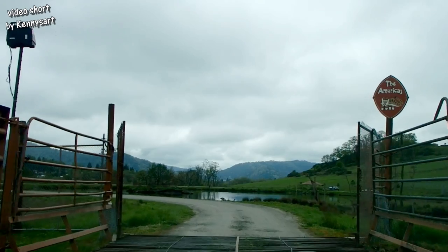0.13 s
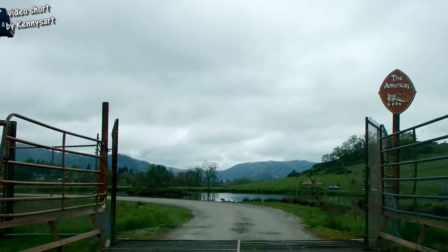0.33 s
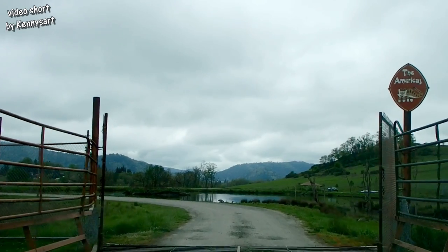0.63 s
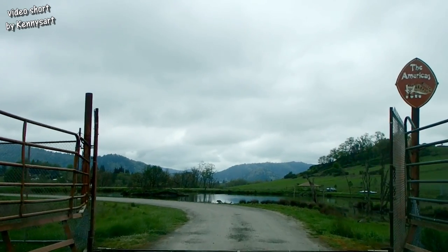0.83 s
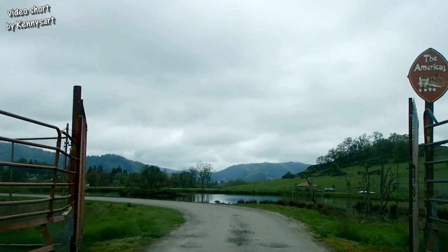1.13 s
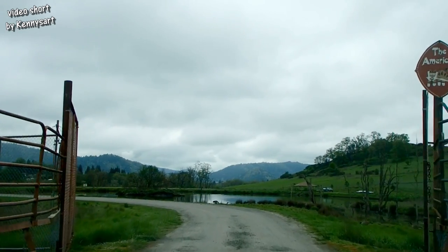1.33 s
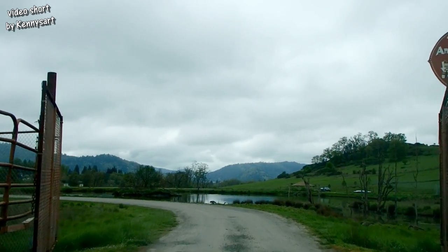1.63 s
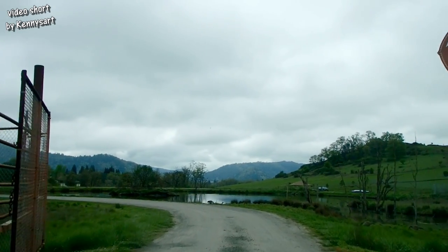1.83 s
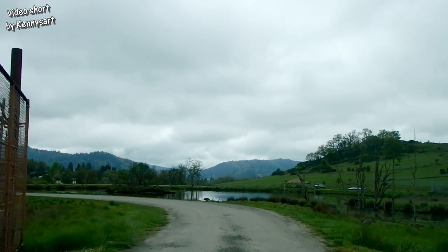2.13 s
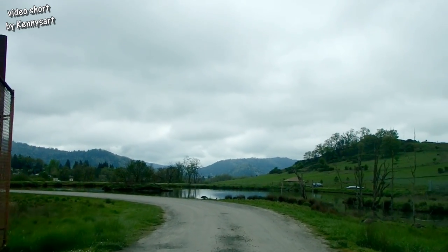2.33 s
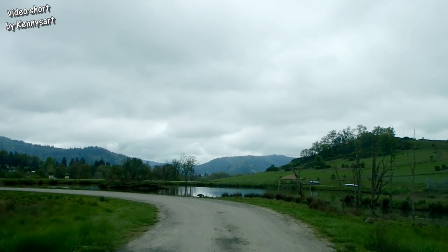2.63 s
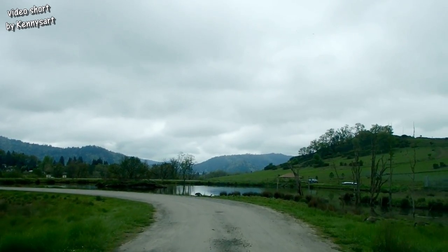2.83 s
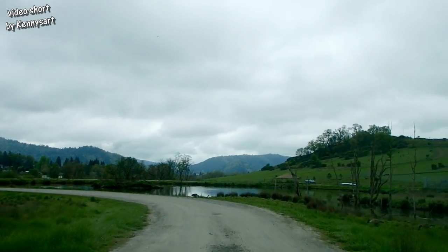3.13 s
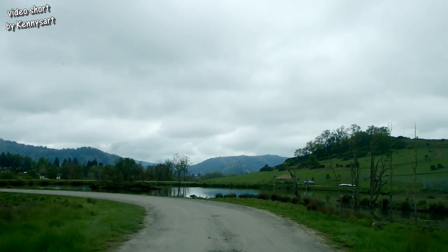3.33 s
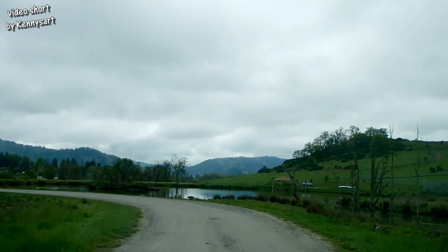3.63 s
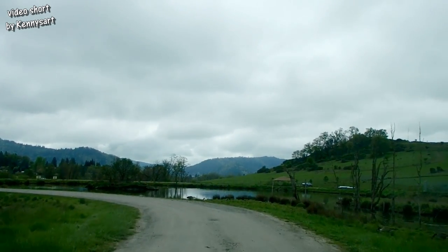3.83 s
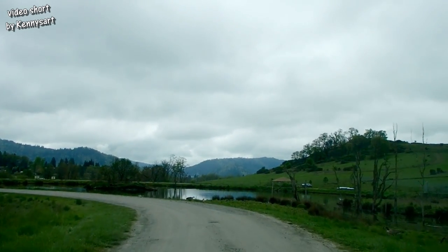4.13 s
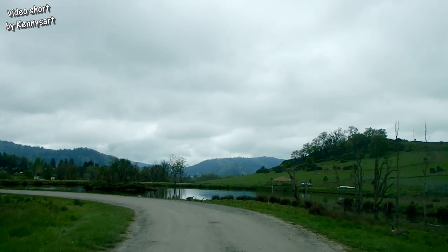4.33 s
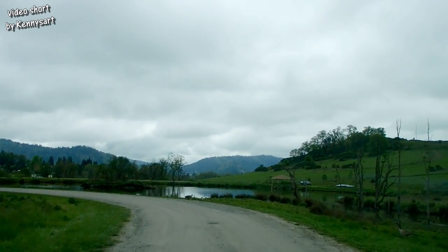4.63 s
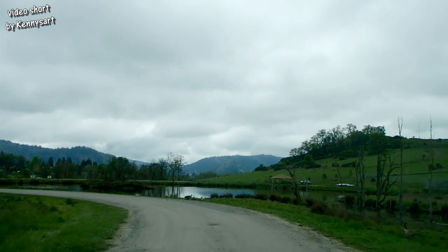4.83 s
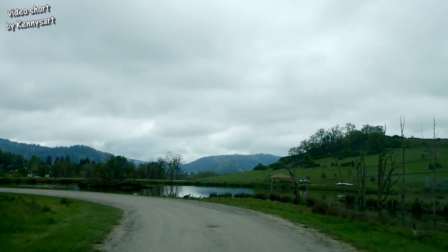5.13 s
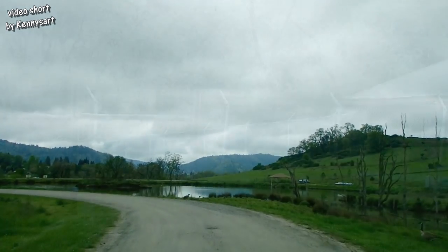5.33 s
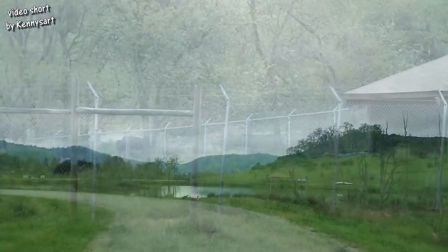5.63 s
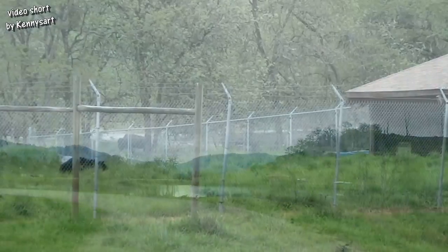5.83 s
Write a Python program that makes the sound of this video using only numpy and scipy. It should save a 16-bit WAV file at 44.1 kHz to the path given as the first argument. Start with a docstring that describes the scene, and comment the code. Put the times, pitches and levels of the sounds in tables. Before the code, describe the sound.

Heard from inside a slow car on a gravel road: muffled low boom and soft tyre roar with small metal clinks. Just after two seconds the wheels reach a steel cattle grid; the deck drums, pipes clank, and loose trim knocks loudly near the microphone until about five seconds. The road rumble then returns and fades.

```python
"""Inside a car that rolls slowly along a gravel road and over a steel cattle grid: cabin boom, tyre roar
and grit are evened-out streams of tiny random impacts, coloured by filters. On the bars the boom swells,
loose pipes clank as noise chatter that rings a bank of modes, and trim close to the microphone knocks as
short decaying sines with noise ticks. A faint whine, two squeaks and hiss lie around them.
Then the tyres are back on gravel and the road sound fades."""
import sys
import numpy as np
from scipy import signal
from scipy.fft import rfft, irfft, next_fast_len
from scipy.io import wavfile
from scipy.ndimage import uniform_filter1d

SR = 44100
rng = np.random.default_rng(int(sys.argv[2]) if len(sys.argv) > 2 else 0)


def int16_out(signal):
    """Quantize to a 16-bit WAV file."""
    q = np.round(np.clip(np.atleast_2d(signal).T, -1, 1) * 32767)
    wavfile.write(sys.argv[1], SR, q.astype(np.int16))


N = 263716
TIME = np.arange(N) / SR
# padded transform length [samples] and its frequencies [Hz], kept above zero for the logarithms
SIZE = next_fast_len(N + 8192, real=True)
FREQ = np.maximum(np.arange(SIZE // 2 + 1) * SR / SIZE, 1)

# microphone hiss, spectrum: (frequency [Hz], relative level [dB])
HISS_SPECTRUM = [(1000, -15), (6000, 2.5), (15000, -0.5)]
# level of the hiss, which sinks with the closing fade: (time [s], level [dB])
HISS_LEVEL = [(0, -54), (5.45, -52.5), (5.98, -60.5)]
# the faint whine: (frequency [Hz], pulse rate [1/s], level at the top of each pulse [dB], end [s])
WHINE = (6220, 7.45, -62, 2.1)

# the gravel road: (time [s], cabin boom [dB], tyre roar [dB], loose grit [dB]), before the closing fade
ROAD_LEVELS = [(0, -30, -37, -50), (.3, -34, -38, -60), (.55, -31.5, -37, -60), (.8, -35.5, -38.5, -57),
               (1.12, -33, -38, -57), (1.45, -36, -38, -56), (1.95, -33.5, -36, -44),
               (2.3, -35.5, -36.5, -46.5), (5.4, -30, -38, -38.5), (5.98, -35.5, -36.5, -55.5)]
# closing fade of the road sound: start [s], slope [dB/s]
FADE_FROM_S, FADE_DB_PER_S = 5.32, 10.5
# cabin boom on the road: (frequency [Hz], relative level [dB])
ROAD_BOOM = [(14, -42), (30, -14), (55, -6), (70, -27), (92, -0.5), (106, -1.5), (122, -5), (145, -9.5),
             (175, -11), (300, -9), (400, -13.5), (520, -12.5), (700, -34), (1400, -59)]
# boom of the steel deck as it takes the car's weight: (frequency [Hz], relative level [dB])
DECK_BOOM = [(14, -11), (32, -14), (55, -10), (68, -15), (95, -3), (120, -3.5), (180, -7.5), (210, -11.5),
             (228, 3), (250, -11), (300, -9), (420, -18), (650, -20), (1400, -64)]
# cabin boom on the bars: (frequency [Hz], relative level [dB])
BARS_BOOM = [(14, -42), (33, -9.5), (56, -11.5), (78, -13), (104, -1), (135, -0.5), (160, -8), (190, 1),
             (228, -6.5), (300, -7), (420, -18.5), (650, -23.5), (1400, -75.5)]
# the wheels load the steel deck and it drums: (time [s], length [s], level [dB])
DECK_LOADS = [(2.32, 1.3, -24), (2.44, 0.24, -20), (3.42, 0.094, -20.5)]
# the wheels run over the bars: (time [s], length [s], level [dB])
BAR_RUNS = [(3.7, 1.55, -22), (3.89, 1.35, -22.5), (4.04, 0.22, -15.5), (4.2, 0.16, -15),
            (4.41, 0.64, -18.5), (4.66, 0.13, -13), (5.01, 0.18, -13)]
# the body takes up a load and settles again [s]
BODY_ATTACK_S, BODY_RELEASE_S = 0.038, 0.074

# tyre roar as it reaches the cabin: (frequency [Hz], relative level [dB])
ROAR_SPECTRUM = [(150, -29), (400, 0), (570, 4), (820, 2), (1250, 2), (1600, -0.5), (1950, 2.5),
                 (2150, -5.5), (2600, -1), (3100, -2), (3450, -14), (4400, -17), (6000, -30.5),
                 (12000, -67)]
# loose grit as it reaches the cabin: (frequency [Hz], relative level [dB])
GRIT_SPECTRUM = [(1200, -26), (2300, -30), (2900, 8.5), (3450, -2.5), (3850, 2.5), (4100, 0.5), (4500, 1),
                 (5000, -8), (5800, -19), (8500, -17), (11000, -24), (15000, -66)]
# tyre roar on the grid: level at a shake of 0 dB [dB], growth with the shaking [dB per dB]
SHAKE_ROAR_DB, SHAKE_ROAR_SLOPE = -20, 0.54
# bouts in which everything loose in the car rattles: (time [s], length [s], crackle level [dB])
RATTLES = [(3.61, 0.36, -35.5), (3.91, 0.12, -30.5), (4.28, .2, -34), (4.68, 0.56, -35),
           (4.84, 0.13, -32.5), (5.11, 0.071, -31.5), (5.3, 0.13, -48)]
# a bout starts and dies away [s]; its lower clatter relative to its crackle [dB]
RATTLE_ATTACK_S, RATTLE_RELEASE_S, CLATTER_DB = 0.024, 0.019, 8

# the chassis squeaks: (centre time [s], frequency [Hz], peak level [dB])
SQUEAKS = [(.033, 4450, -40), (.053, 4510, -36)]

# loose pipes struck by a wheel: (time [s], relative level [dB], bright ring [dB],
# strongest note [Hz], its lift [dB], length of the chatter [s])
CLANKS = [(.023, -28.5, -32, 792, 34, .022), (.058, -25, -8, 1240, 21, .009),
          (.516, -26.5, -3, 1270, 15, .005), (.59, -28.5, -11, 1300, 10, 0.011),
          (.656, -28, -22, 1150, 14, .008), (1.668, -36.5, 1.5, 1400, -3.5, 0.032),
          (1.923, -39, 13, 3000, 7, 0.0073), (2.22, -34.5, 7.5, 1120, 10.5, 0.018),
          (2.476, -19, 12, 2770, 8, 0.027), (2.493, -16.5, -9, 1760, 2.5, .046),
          (2.5973, -15, 10.5, 1690, 15, 0.021), (2.609, -13, -7, 910, 10.5, 0.026),
          (2.715, -24.5, -6, 1770, 7.5, 0.038), (2.978, -21.5, 12, 1720, 20.5, 0.04),
          (3.049, -23, 9, 4040, 21, 0.019), (3.058, -11.5, -2.5, 1270, 15.5, 0.018),
          (3.0796, -9.5, -22, 1210, 25, 0.0037), (3.231, -17, -19, 1360, 4, 0.0024),
          (3.449, -23, 13.5, 1600, 26, 0.099), (3.508, -13, 4, 2290, 1, 0.0091),
          (3.516, -8.5, -16, 1250, 10.5, 0.016), (3.629, -17.5, -8, 990, 14, 0.01),
          (3.997, -22.5, -3.5, 1680, -0.5, 0.091), (4.309, -21.5, -31, 1370, 0, 0.075),
          (4.838, -16, 4, 2030, 17, 0.023), (4.915, -19.5, 3, 1290, 10, 0.0095),
          (5.241, -17.5, 7.5, 1350, 16, 0.023)]
# what the pipes ring with: (frequency [Hz], relative level [dB], t60 [s])
PIPE_MODES = [(690, -4, .08), (931, -2, .06), (1185, -1, .12), (1235, -2, .09), (1330, -2, .09),
              (1570, -4, .08), (1615, -2, .13), (1780, -1, .09), (1930, -4, .06), (2280, -8, .07),
              (2460, -5, .08), (2700, -3, .07), (2880, -3, .08), (3050, -3, .06), (4030, -17, .05),
              (4300, -17, .06)]
# the crash of steel on steel: (frequency [Hz], relative level [dB])
CRASH_SPECTRUM = [(150, -10), (400, -1.5), (700, -4.5), (1000, 3), (1800, 3.5), (2150, 1), (2700, 2),
                  (3050, 3.5), (3500, -12.5), (4500, -14.5), (5800, -45), (9000, -33.5), (13500, -34)]
# width of a clank's strongest note [natural log of frequency, about a share of its pitch]
NOTE_SPAN = .12

# a jolt sets the loose trim bouncing:
# (time [s], number of knocks, first relative peak [dB], change per knock [dB])
BOUNCES = [(3.4207, 1, -17.5, 0), (3.486, 1, -8, 0), (3.561, 2, -12, -0.5), (3.683, 1, -8.5, 0),
           (3.7383, 1, -15.5, 0), (3.919, 3, -1.5, -3.5), (4.184, 1, -9.5, 0), (4.2514, 1, -11, -2),
           (4.388, 1, -4, 0), (4.4728, 1, -8, 0), (4.6658, 2, -8.5, 5), (4.782, 3, -1.5, -3.5),
           (4.9535, 1, -1, 0), (5.0286, 1, -7.5, 0), (5.0595, 4, -0.5, -0.5), (5.306, 2, -13.5, 1.5)]
# time between knocks at 0 dB [s]; weaker bounces are a little slower [s per dB]
BOUNCE_S, BOUNCE_S_PER_DB = .0568, .00042
# lighter fall after each knock: delay [s], scatter [s], level [dB], brightening [dB per octave]
REBOUND_S, REBOUND_SCATTER_S, REBOUND_DB, REBOUND_TILT_DB = .021, 0.002, -13.5, 26
# plastic trim: (frequency [Hz], relative level [dB], t60 [s])
TRIM_MODES = [(2714, 19, 0.0096), (2930, 12, 0.01), (3023, 6, 0.025), (3760, 3, 0.045), (4340, 7.5, 0.021)]
# the hard tick: (frequency [Hz], relative level [dB])
TICK_SPECTRUM = [(2000, -22), (4400, 3.5), (5400, 1.5), (6000, -9), (6650, 2.5), (7200, -9), (8350, 2),
                 (8900, -7.5), (9600, -2), (10500, -13.5), (12800, -16), (14000, -30)]
# growth of the hard tick with the knock [dB per dB]
TICK_SLOPE = 0.98

# side against mid in the cabin: (frequency [Hz], level difference [dB])
SIDE_LEVEL = [(30, -15), (110, -25), (300, -30), (700, -26), (1300, -25), (2400, -17), (3300, -11),
              (4400, -9), (7000, -2)]
# left minus right at the microphone ports: (frequency [Hz], level difference [dB])
PORT_BALANCE = [(40, -1), (250, -.3), (1500, -.7), (2800, -1.5), (3300, -7), (3800, 0), (4600, -1),
                (5500, 4), (9500, 4), (12000, 0)]
# upper edge of the capsules and of the recorder [Hz]; ceiling of the rounded peaks [full scale 1]
MIC_HZ, TOP_HZ, CEILING = 13800, 15650, .93


def undb(db):
    """Decibels to gain."""
    return 10 ** (np.asarray(db) / 20)


def unit(x):
    """Scale to rms 1."""
    return x / np.sqrt(np.mean(x ** 2))


def curve(rows, axis=1):
    """One column of a table, joined by straight lines in time."""
    rows = np.array(rows)
    return np.interp(TIME, rows[:, 0], rows[:, axis])


def response(points):
    """Gain at every frequency, drawn through (frequency [Hz], level [dB]) points on a log axis."""
    hz, db = np.transpose(points)
    return undb(np.interp(np.log(FREQ), np.log(hz), db))


def colour(x, points):
    """Causal minimum-phase filter of the given shape and unit power gain, by folding the cepstrum."""
    cepstrum = irfft(np.log(unit(response(points))), SIZE)
    cepstrum[1:SIZE // 2] *= 2
    cepstrum[SIZE // 2 + 1:] = 0
    transfer = np.exp(rfft(cepstrum))
    return irfft(rfft(x, SIZE) * transfer, SIZE)[..., :N]


def even(x, seconds):
    """Hold the short-time level of each channel of a pair near 1."""
    power = uniform_filter1d(x ** 2, int(seconds * SR), axis=-1)
    return x / np.sqrt(power + 1e-9)


def add(track, at, sound):
    """Mix a sound into a track at a time in seconds."""
    start = max(int(at * SR), 0)
    track[..., start:start + sound.shape[-1]] += sound[..., :N - start]


def swells(rows, attack_s, release_s):
    """Gain of overlapping swells that each rise, hold and die away; their powers add."""
    power = np.zeros(N)
    for at, length, db in rows:
        rise = np.clip((TIME - at) / attack_s, 0, 1)
        fall = np.exp(-np.maximum(TIME - at - length, 0) / release_s)
        power += (undb(db) * rise * fall) ** 2
    return np.sqrt(power)


def grains(rate, spread_db):
    """Mid and side streams of tiny impacts (rate per second); a wide spread makes a few much larger."""
    sizes = undb(spread_db * np.minimum(rng.exponential(size=(2, N)), 4))
    hits = rng.random((2, N)) < rate / SR
    return unit(hits * sizes * rng.choice([-1, 1], (2, N)))


def crackle(rate, spread_db, seconds):
    """Every grain is its own short burst of decaying noise."""
    keep = np.exp(-1 / (seconds * SR))
    power = signal.lfilter([1], [1, -keep], grains(rate, spread_db) ** 2)
    return np.sqrt(power) * rng.standard_normal((2, N))


def ring(modes, t):
    """Decaying sines, one row a mode."""
    hz, db, t60 = np.transpose(modes)[..., None]
    decay = np.exp(-np.log(1000) * t / t60)
    return undb(db) * decay * np.sin(2 * np.pi * hz * t)


def detune(modes, spread):
    """The same part struck elsewhere: every mode shifts a little in pitch and level."""
    modes = np.array(modes, float)
    pitch, level = rng.standard_normal((2, len(modes)))
    return np.column_stack([modes[:, 0] * (1 + spread * pitch), modes[:, 1] + 0.95 * level, modes[:, 2]])


def cabin(x, t60, wet_db):
    """Direct sound and a short spray of reflections from glass and dashboard."""
    t = TIME[:len(x)]
    tail = rng.standard_normal((2, len(t))) * np.exp(-np.log(1000) * t / t60)
    tail *= undb(wet_db) / np.sqrt(np.sum(tail ** 2, axis=1, keepdims=True))
    return x + signal.fftconvolve(x[None], tail, axes=1)[:, :len(x)]


def hiss():
    """The microphone's own noise: coloured and independent in the two channels."""
    return undb(curve(HISS_LEVEL)) * colour(rng.standard_normal((2, N)), HISS_SPECTRUM)


def whine(hz, rate_hz, db, end_s):
    """A faint high whine that pulses on the way to the grid: narrow-band noise under a sine-power gain."""
    bandpass = signal.butter(2, [hz - 90, hz + 90], "band", fs=SR, output="sos")
    band = signal.sosfilt(bandpass, rng.standard_normal((2, N)))
    pulses = np.sin(np.pi * rate_hz * TIME) ** 4
    return even(band, .03) * undb(db) * pulses * (TIME < end_s)


def road_fade():
    """Gain of the road sound: steady until the closing fade."""
    return undb(-FADE_DB_PER_S * np.maximum(TIME - FADE_FROM_S, 0))


def body(road_level, deck_level, bars_level):
    """Jolts through the suspension set the cabin booming: from road, drumming deck and single bars."""
    road = even(colour(grains(rate=1500, spread_db=2.0), ROAD_BOOM), 0.18)
    deck = even(colour(grains(rate=800, spread_db=0.0), DECK_BOOM), .07)
    bars = even(colour(grains(rate=500, spread_db=-0.5), BARS_BOOM), 0.0467)
    return road * road_level + deck * deck_level + bars * bars_level


def tyres(roar_level, grit_level, shake, rattle):
    """Treads roar evenly on the road and clatter as the car shakes; grit and small rattles crackle on top."""
    treads = crackle(rate=1100, spread_db=2.1, seconds=.005)
    jolts = crackle(rate=500, spread_db=2.5, seconds=.005)
    stones = crackle(rate=300, spread_db=2.9, seconds=.003)
    shake_roar = undb(SHAKE_ROAR_DB) * shake ** SHAKE_ROAR_SLOPE
    clatter_level = np.hypot(shake_roar, undb(CLATTER_DB) * rattle)
    roar = even(colour(treads, ROAR_SPECTRUM), 0.15) * roar_level
    clatter = even(colour(jolts, ROAR_SPECTRUM), .07) * clatter_level
    grit = even(colour(stones, GRIT_SPECTRUM), 0.18) * np.hypot(grit_level, rattle)
    return roar + clatter + grit


def squeaks(length_s):
    """Brief high chirps of metal rubbing on metal: steady sines under a bell-shaped swell."""
    out, t = np.zeros(N), TIME[:SR // 25]
    middle = t[-1] / 2
    for at, hz, db in SQUEAKS:
        swell = np.exp(-((t - middle) / length_s) ** 2)
        add(out, at - middle, undb(db) * swell * np.sin(2 * np.pi * hz * t))
    return out


def pipes(crash_db, ring_db, tail_s, tail_db, rise_s):
    """Each grid pipe chatters in its seat for some milliseconds: a crash, and the ring of its modes."""
    blows, rings = np.zeros((2, 2, N))
    t = TIME[:SR // 5]
    hz, mode_db, _ = np.transpose(PIPE_MODES)[..., None]
    treble = np.clip((hz - 1500) / 1500, 0, 1)
    for at, db, bright_db, note_hz, lift_db, length in CLANKS:
        contact = np.exp(-(t / length) ** 2) + undb(tail_db) * np.exp(-t / tail_s)
        contact *= 1 - np.exp(-t / rise_s)
        # noise with a jumping level makes the contact rough
        rough = rng.standard_normal((2, len(t))) * undb(3.6 * rng.standard_normal(len(t)))
        chatter = even(rough, 0.016) * contact
        modes = ring(detune(PIPE_MODES, .009), t)
        struck = signal.fftconvolve(chatter[:, None], modes[None], axes=2)[..., :len(t)]
        # where the wheel meets the pipe decides which modes take the blow
        near_note = np.exp(-(np.log(hz / note_hz) / NOTE_SPAN) ** 2)
        share = undb(mode_db + bright_db * treble + lift_db * near_note)
        tone = np.sum(struck / struck.std(axis=2, keepdims=True) * share, axis=1)
        add(rings, at, undb(db + ring_db) * unit(tone) * np.sqrt(np.mean(contact ** 2)))
        # the cleaner the note, the less it crashes
        add(blows, at, undb(db + crash_db + .5 * (bright_db - lift_db)) * chatter)
    return rings + colour(blows, CRASH_SPECTRUM)


def bounces():
    """Time and relative level of every knock as the trim bounces on its seat."""
    for at, count, db, step_db in BOUNCES:
        for _ in range(round(count)):
            yield at, db
            at += BOUNCE_S - BOUNCE_S_PER_DB * db
            db += step_db


def trim(knock_db, tick_db, lag_s, tick_s, push_s):
    """Plastic knocks on its seat, buzzes against something hard and falls back; returns knocks and ticks."""
    knocks, ticks = np.zeros((2, 2, N))
    t = TIME[:SR // 15]
    push = 1 - np.exp(-(t / push_s) ** 2)
    octaves = np.log2(np.array(TRIM_MODES)[:, :1] / TRIM_MODES[0][0])
    for start, peak_db in bounces():
        back = start + REBOUND_S + REBOUND_SCATTER_S * rng.standard_normal()
        for at, db, tilt_db in (start, peak_db, 0), (back, peak_db + REBOUND_DB, REBOUND_TILT_DB):
            modes = ring(detune(TRIM_MODES, .02), t)
            knock = np.sum(modes * undb(tilt_db * octaves), axis=0) * push
            knock /= np.abs(knock).max()
            add(knocks, at, undb(db + knock_db) * cabin(knock, t60=0.047, wet_db=-2.5))
            buzz = rng.standard_normal((2, len(t))) * np.exp(-t / tick_s) * push
            add(ticks, at + lag_s, undb(TICK_SLOPE * db + tick_db) * buzz)
    return knocks, colour(ticks, TICK_SPECTRUM)


def scene():
    """All the car's sounds reach two close ports, the left one first; the hard tick sits by the left one."""
    boom, roar, grit = (undb(curve(ROAD_LEVELS, axis=k)) * road_fade() for k in (1, 2, 3))
    deck = swells(DECK_LOADS, BODY_ATTACK_S, BODY_RELEASE_S)
    bars = swells(BAR_RUNS, BODY_ATTACK_S, BODY_RELEASE_S)
    rattle = swells(RATTLES, RATTLE_ATTACK_S, RATTLE_RELEASE_S)
    road = body(boom, deck, bars) + tyres(roar, grit, np.hypot(deck, bars), rattle)
    steel = pipes(crash_db=1.0, ring_db=-4.0, tail_s=0.048, tail_db=-8.5, rise_s=0.00064)
    knocks, ticks = trim(knock_db=-1.5, tick_db=-18.5, lag_s=0.0017, tick_s=0.0061, push_s=0.00046)
    mid, side = rfft(road + steel + knocks, SIZE)
    sign = np.array([[1], [-1]])  # left, right
    # the left port leads by 30 microseconds; above 2500 Hz the phase lead stays constant
    lead = np.exp(sign * 1j * np.pi * np.minimum(FREQ, 2500) * 3e-5)
    stereo = mid + sign * side * response(SIDE_LEVEL)
    ports = irfft(stereo * lead * response(PORT_BALANCE) ** (sign / 2), SIZE)[:, :N]
    car = ports + ticks * undb([[3], [-10]]) + squeaks(length_s=0.0041) + whine(*WHINE)
    # the capsules lose the highest treble, their own hiss does not
    car = signal.sosfilt(signal.butter(8, MIC_HZ, fs=SR, output="sos"), car)
    return car + hiss()


def record(dry):
    """The loudest peaks are rounded off and the top is cut."""
    rounded = dry / (1 + (dry / CEILING) ** 8) ** (1 / 8)
    return signal.sosfilt(signal.ellip(12, .1, 90, TOP_HZ, fs=SR, output="sos"), rounded)


dry = scene()
out = record(dry)
int16_out(out)
```